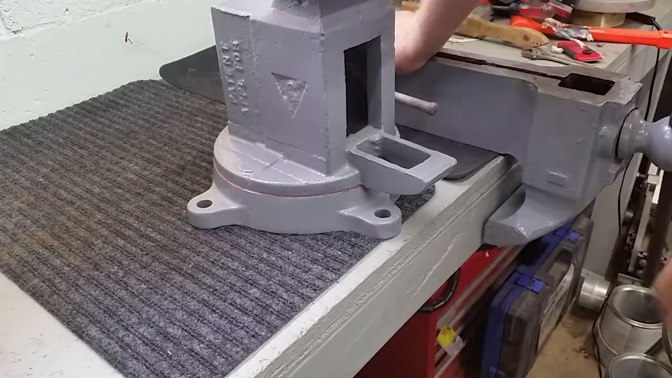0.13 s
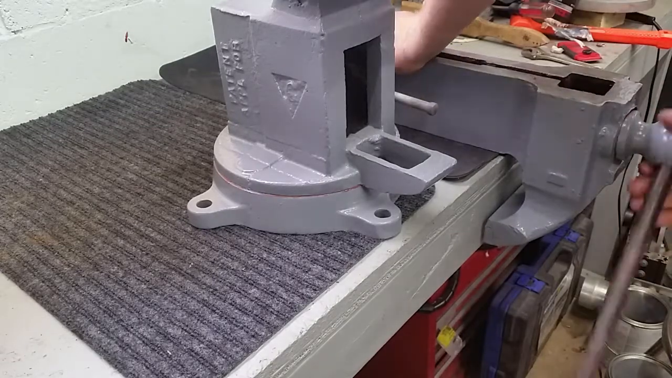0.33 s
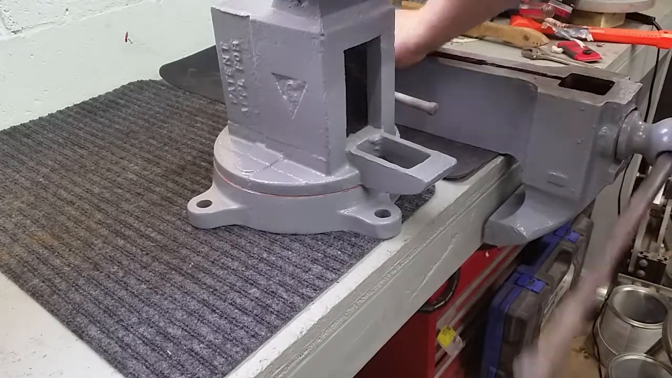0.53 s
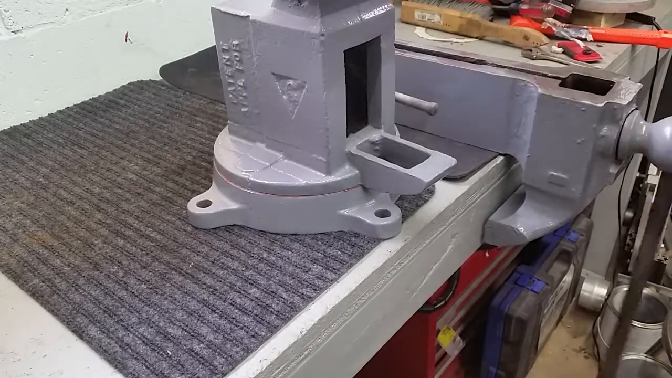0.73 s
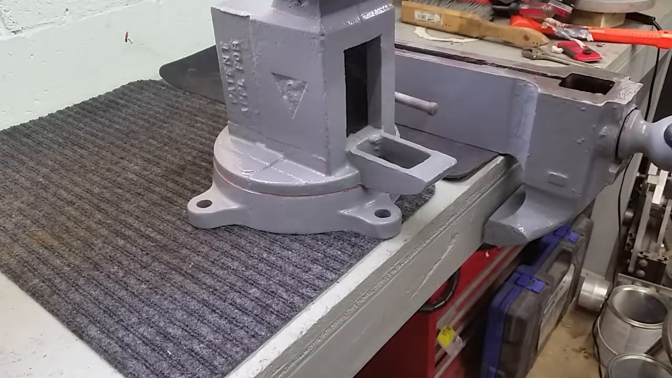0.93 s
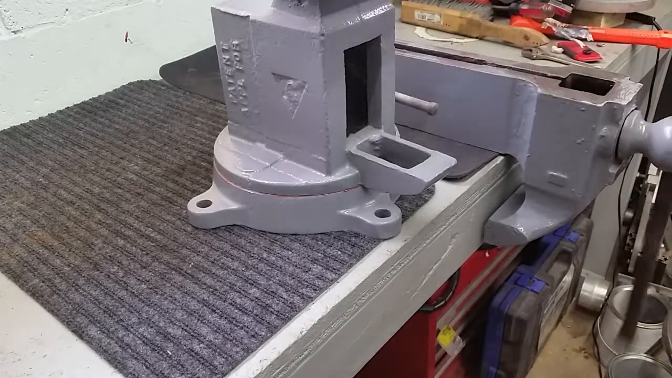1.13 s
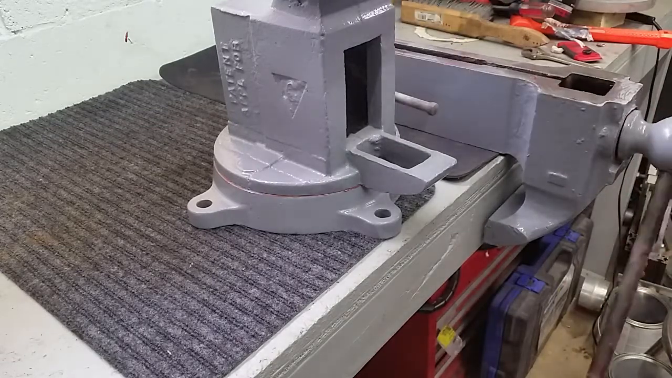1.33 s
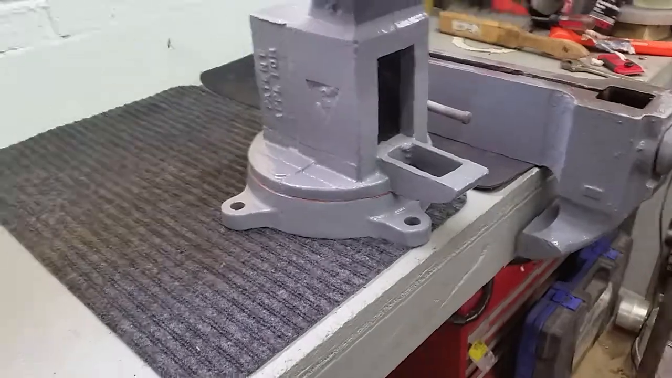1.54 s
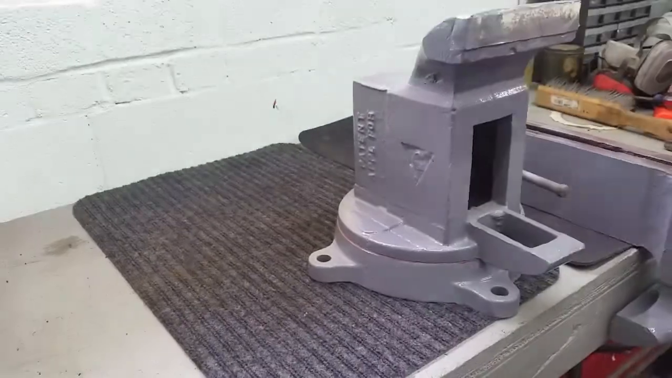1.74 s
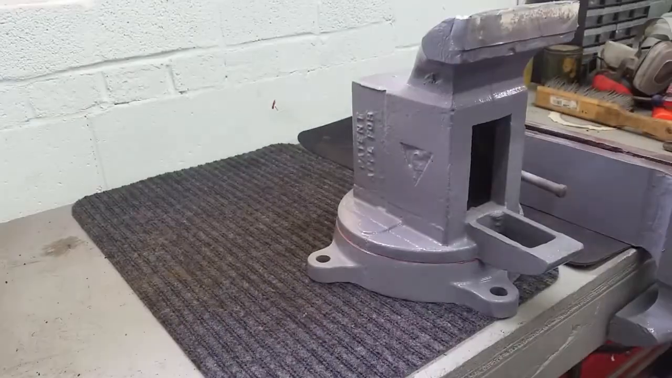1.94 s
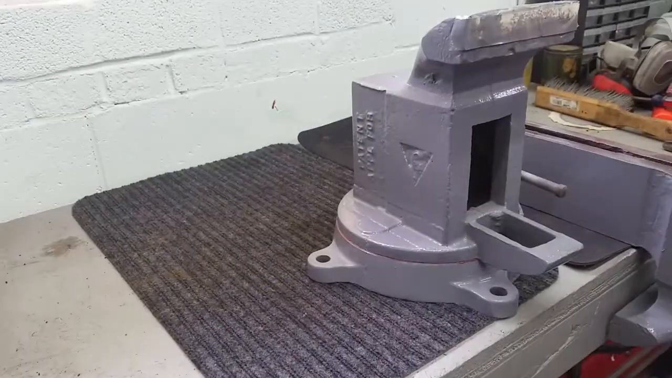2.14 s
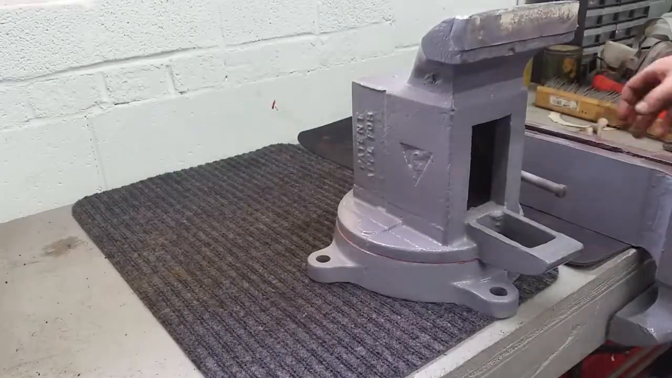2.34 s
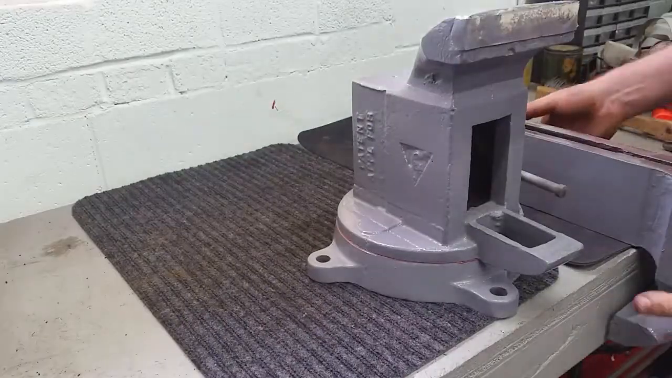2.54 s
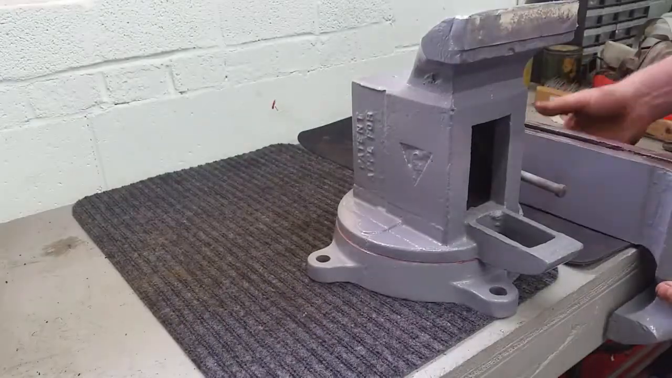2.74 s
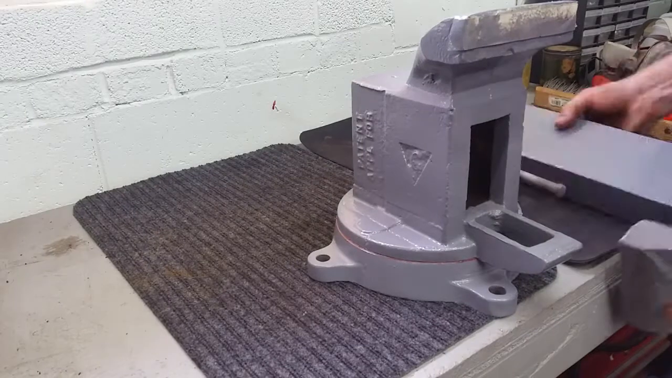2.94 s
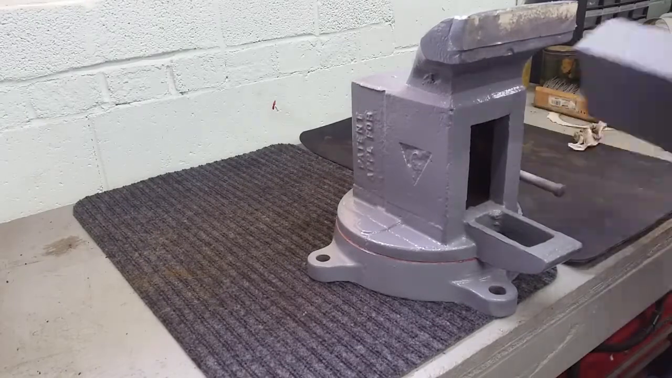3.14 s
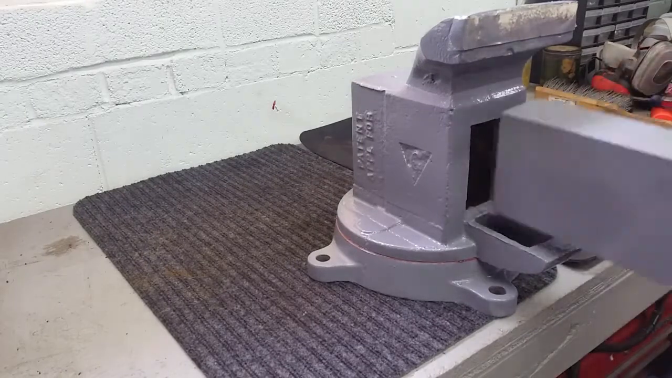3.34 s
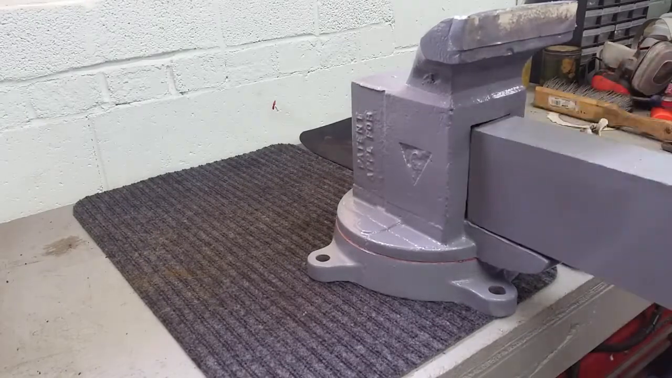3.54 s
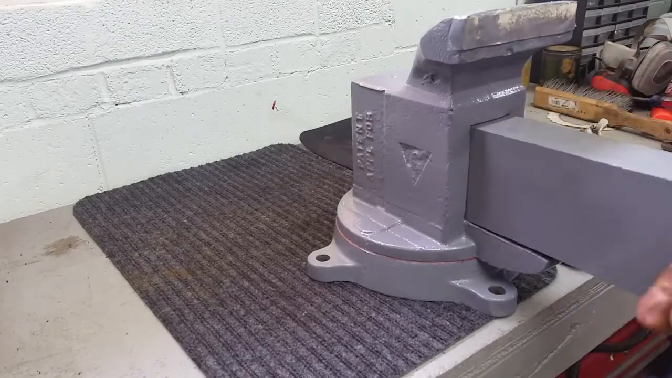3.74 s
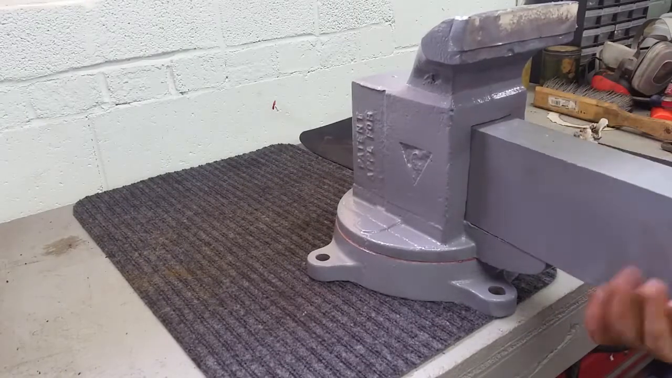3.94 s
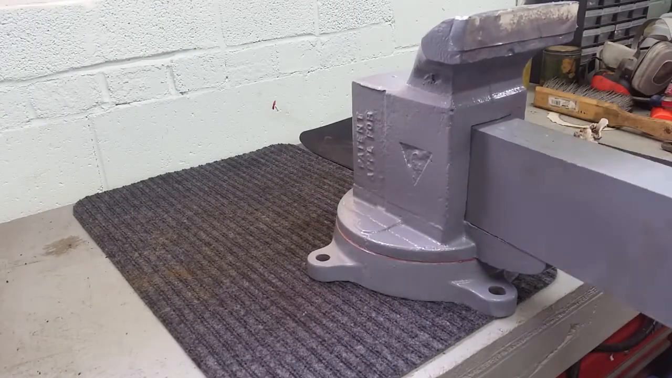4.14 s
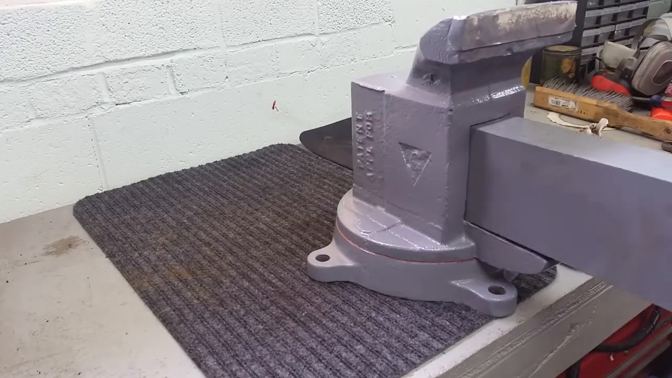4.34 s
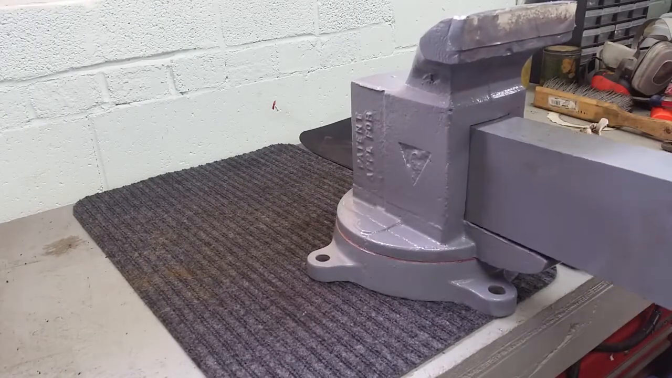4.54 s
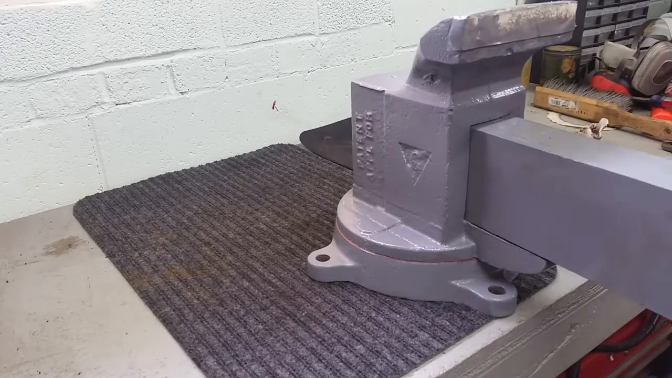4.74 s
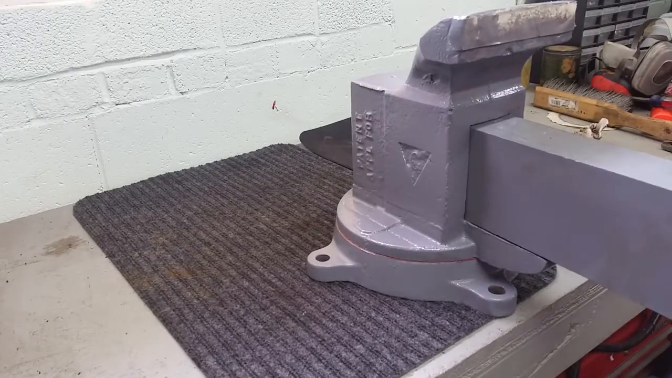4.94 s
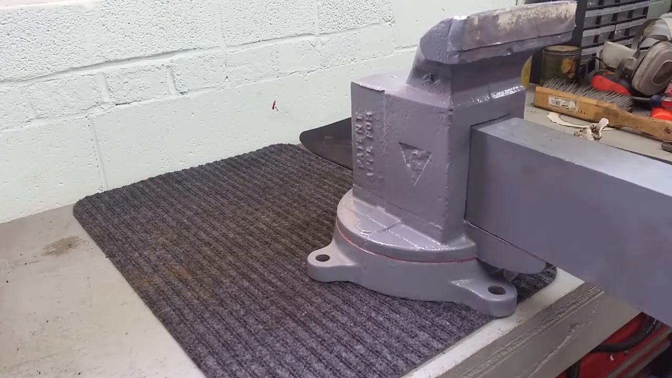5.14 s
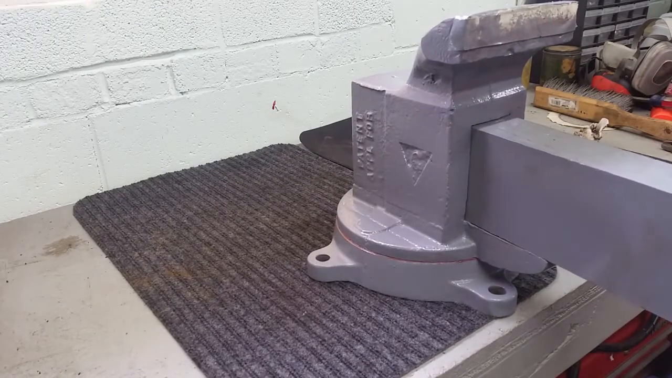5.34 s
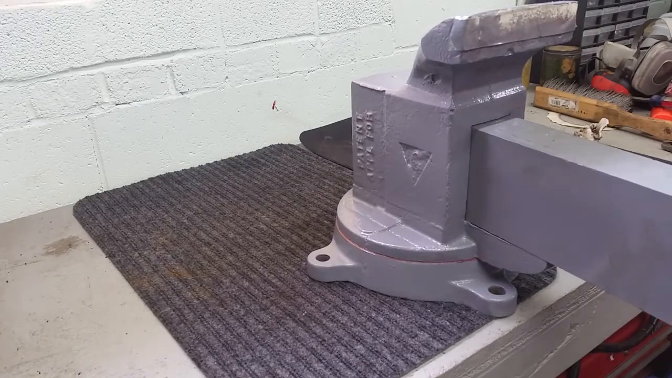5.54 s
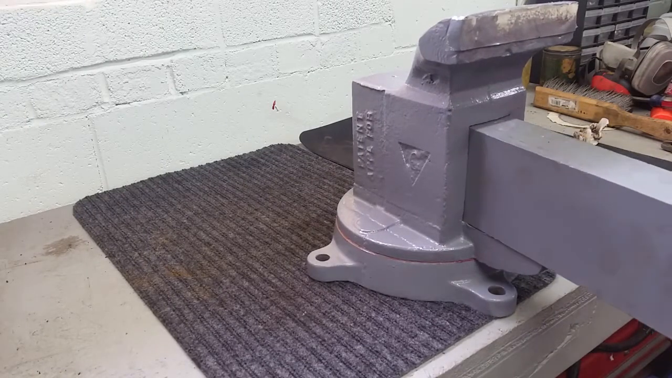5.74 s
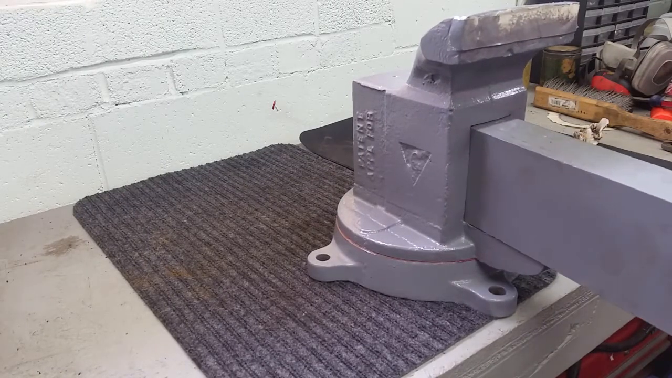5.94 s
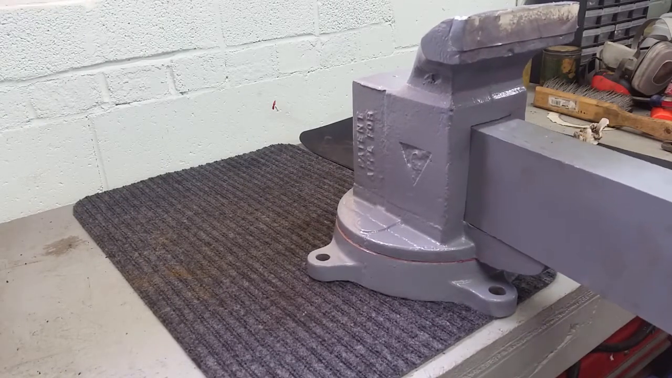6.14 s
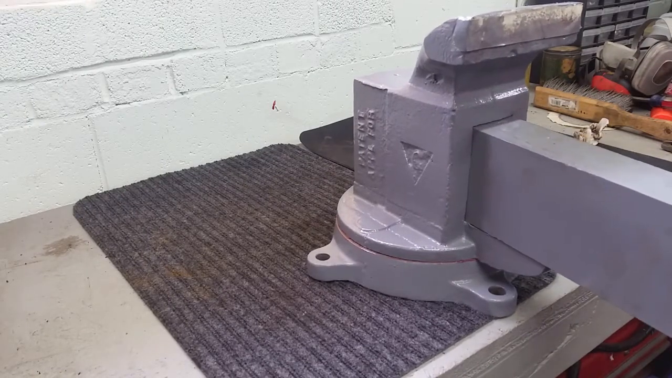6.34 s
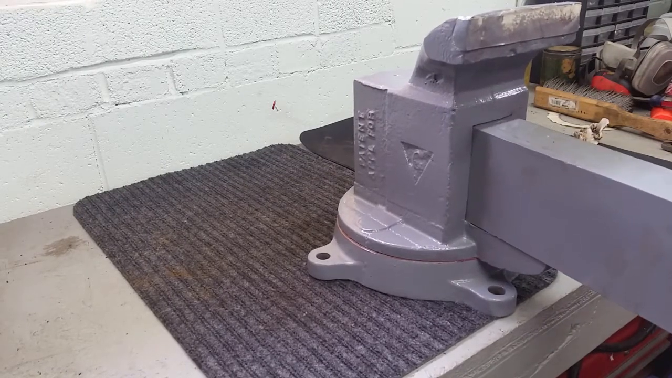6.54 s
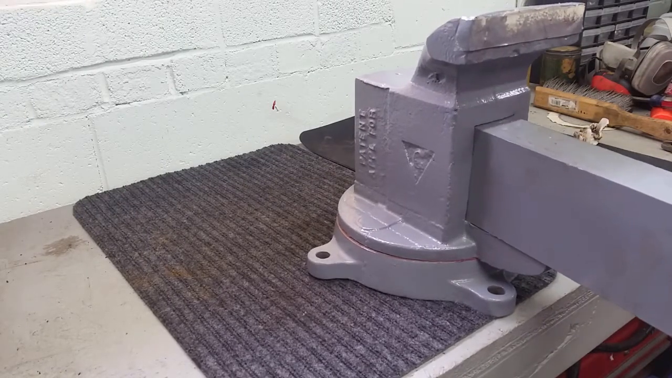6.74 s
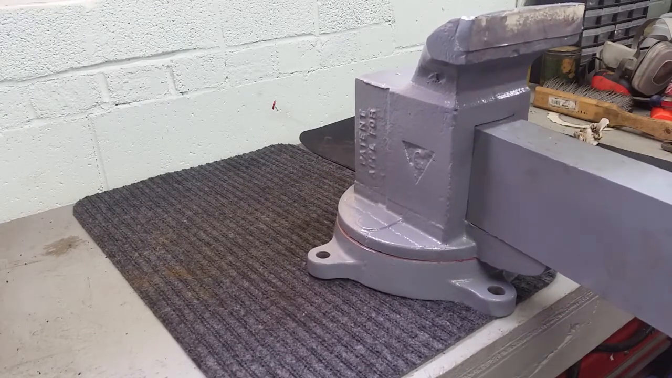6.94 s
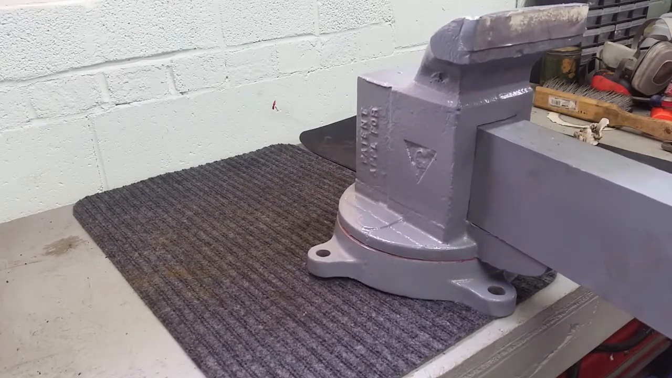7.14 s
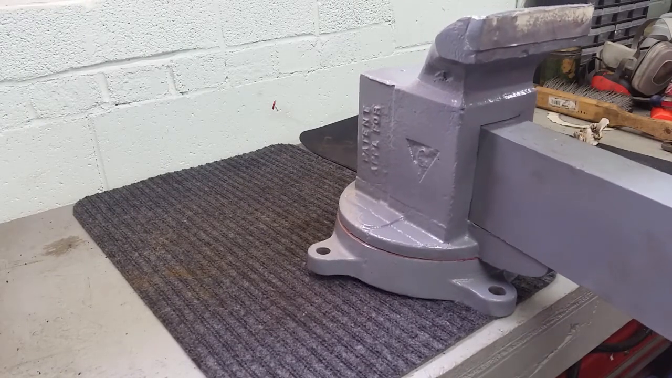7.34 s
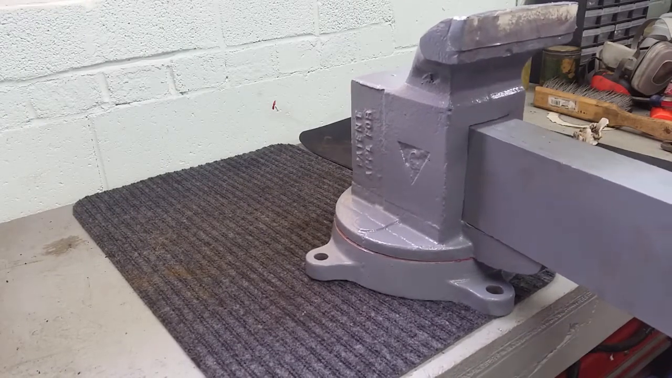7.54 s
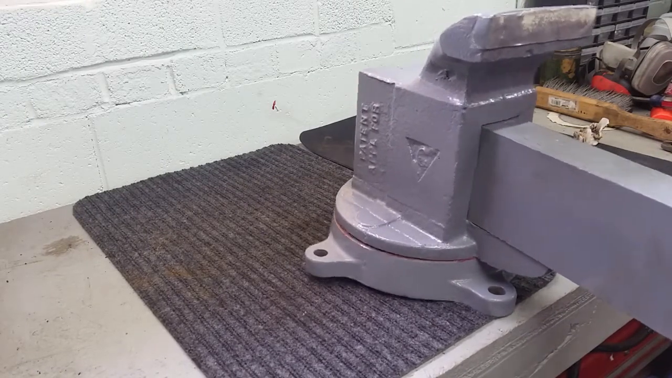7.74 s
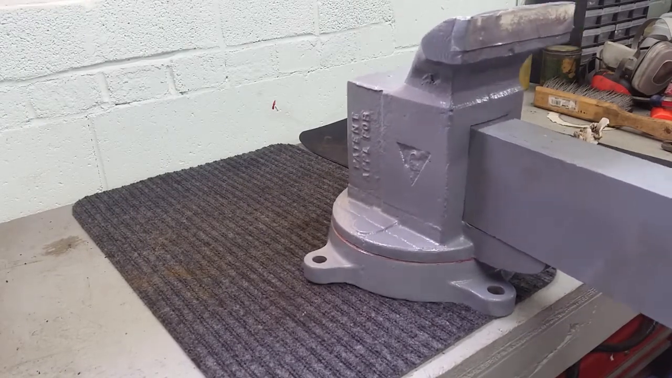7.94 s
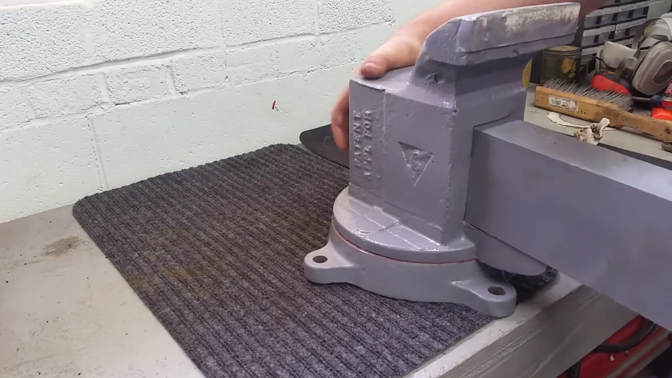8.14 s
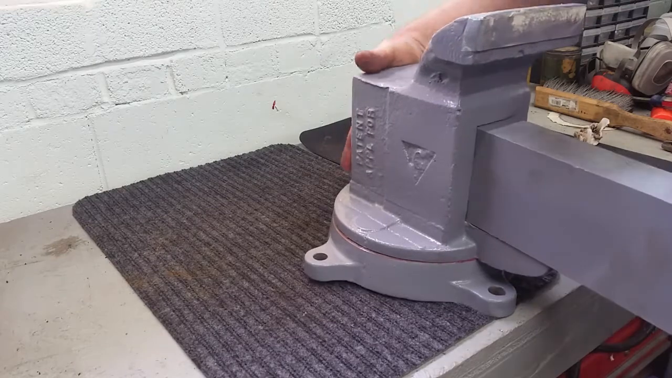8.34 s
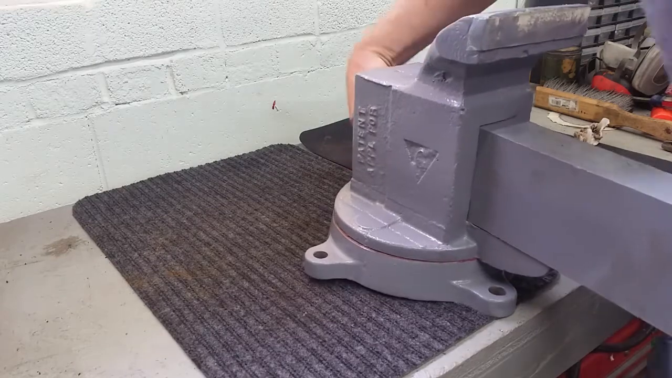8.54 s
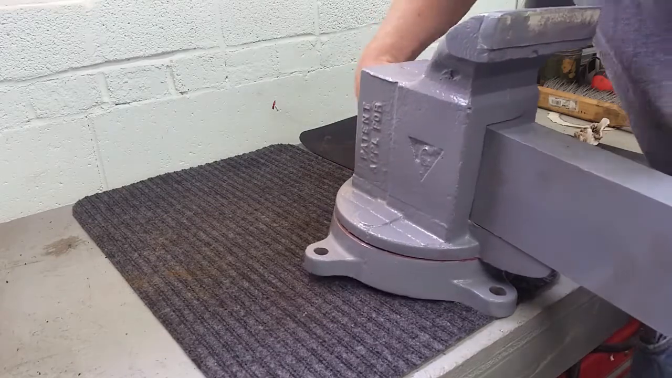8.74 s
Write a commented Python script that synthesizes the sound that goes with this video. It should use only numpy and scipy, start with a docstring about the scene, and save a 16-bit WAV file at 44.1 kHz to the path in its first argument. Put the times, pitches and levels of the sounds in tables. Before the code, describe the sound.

A close, dry stereo view of a heavy cast-iron vise on a workshop bench, over a faint wavering low hum and thin patchy hiss that fades in and briefly dips five times. From 0 to 0.8 s a loose handle clinks and rubs irregularly; from 0.9 to 1.4 s it ticks evenly about every 0.13 s, with soft treble rustles. At 1.5-1.8 s parts clatter down very loudly, stronger on the left, with a tiny rough squeal near 1.65. A soft scuff comes at 2.3, then mostly quiet. From 3.2 to 4 s the slide knocks into the body, bright and ringing, then duller, ending in a scuff. From 4.5 s the screw is wound in: irregular clicks and short gritty scrapes, a hard knock at 5.2, others at 5.8 and 6.0, busy scraping around 7, lower knocks and scuffs at 7.5-8.2, then faint handling and a dull rub near 8.8.

```python
"""In a workshop, a cast-iron bench vise is handled on a mat, over a low wavering hum and a thin patchy hiss
whose level dips briefly five times. The handle clinks, then ticks evenly; parts clatter down and squeal;
the slide knocks into the body; the screw is wound in, scraping and knocking.
Blows are noise bursts ringing the modes of a part; rubbing is noise with uneven grain driving those modes;
the squeal is a jittering tone; hum is sines and narrow noise; hiss, scuffs and rustles are shaped noise."""
import sys
import numpy as np
from scipy import signal
from scipy.fft import rfft, irfft
from scipy.io import wavfile
from scipy.ndimage import uniform_filter1d

SR = 44100
rng = np.random.default_rng(int(sys.argv[2]) if len(sys.argv) > 2 else 0)


def dump(signal):
    """Clip the signal to [-1, 1] and save it as 16-bit WAV at the path in sys.argv[1]."""
    limited = np.clip(np.atleast_2d(signal).T, -1, 1)
    pcm = np.round(limited * 32767).astype(np.int16)
    wavfile.write(sys.argv[1], SR, pcm)


N = 392049


def amp(db):
    """Amplitude ratio of a level in dB."""
    return 10 ** (np.asarray(db) / 20)


def evened(x):
    """Scales to an RMS of 1."""
    return x / np.sqrt(np.mean(x ** 2) + 1e-20)


def clock():
    """Time of every sample in s."""
    return np.arange(N) / SR


def read(points, hz):
    """Interpolates a spectrum table over log frequency."""
    point_hz, value = np.transpose(points)
    return np.interp(np.log(hz + 1), np.log(point_hz + 1), value)


def curve(rows, column=1):
    """Interpolates a table column over time."""
    rows = np.array(rows)
    return np.interp(clock(), rows[:, 0], rows[:, column])


def add(mix, start_s, sound):
    """Mixes a sound in place, cut at the end."""
    part = mix[round(start_s * SR):][:len(sound)]
    part += sound[:len(part)]


def coloured(x, gain):
    """Filters by a gain given as a function of Hz."""
    return irfft(rfft(x) * gain(np.fft.rfftfreq(x.shape[-1], 1 / SR)), x.shape[-1])


def strokes(rows, order):
    """Smooth swells of level; a higher order is flatter on top."""
    t = np.arange(0, N + 32, 32) / SR
    level = sum(amp(db) * np.exp(-abs(2 * (t - middle_s) / length_s) ** order)
                for middle_s, length_s, db in rows)
    return np.interp(clock(), t, level)


def ring(modes, weights, width_scale):
    """Response of a part to one tap: sines that die faster the wider the mode."""
    hz, width_hz, db = np.transpose(modes)[:, :, None]
    t = np.arange(SR // 6) / SR
    width_hz = width_hz * width_scale
    level = weights[:, None] * amp(db) * np.sqrt(width_hz)
    return (level * np.exp(-np.pi * width_hz * t) * np.sin(2 * np.pi * hz * t)).sum(axis=0)


RATTLE_SPREAD_DB, THUD_T60_S = -1.5, .11
FOCUS_DB_PER_OCTAVE, FOCUS_FLOOR_DB = -20, -12  # modes far from the pitch ring less
DETUNE = .015  # random spread of mode pitch, as a fraction
SEATED_DAMPING = 3.0  # a blow that thuds into the bench rings shorter


def blows(table, columns, usual, modes, width_scale, crack_db, snap_t60_s, rattle_t60_s):
    """A snap and a weaker rattle ring the modes near a pitch, crack broadly and thud into the bench."""
    out, t = np.zeros(N), np.arange(SR // 5) / SR
    low = signal.butter(2, [370, 660], "band", fs=SR, output="sos")
    mid = signal.butter(4, [usual["lowest_hz"], 6200], "band", fs=SR, output="sos")
    high = signal.butter(4, 6200, "high", fs=SR, output="sos")
    rise = np.minimum(t / usual["rise_s"], 1)  # contact builds up
    end_fade = np.cos(np.pi / 2 * t / t[-1])
    for start_s, level_db, *own in table:
        blow = {**usual, **dict(zip(columns, own))}
        rattle_db = blow["rattle_db"] + RATTLE_SPREAD_DB * rng.standard_normal()
        decay = amp(-60 * t / snap_t60_s) + amp(rattle_db - 60 * t / rattle_t60_s)
        force = rng.standard_normal(len(t)) * rise * decay

        octaves_off = np.minimum(abs(np.log2(np.transpose(modes)[0] / blow["pitch_hz"])), 1)
        focus_db = np.maximum(FOCUS_DB_PER_OCTAVE * octaves_off, FOCUS_FLOOR_DB)
        weights = amp(focus_db + 2.5 * rng.standard_normal(len(modes)))
        # detune the mode pitches only, not widths or levels
        struck = np.array(modes) * (1 + DETUNE * rng.standard_normal((len(modes), 1)) * [1, 0, 0])
        damped = width_scale * (1 + SEATED_DAMPING * min(amp(blow["thud_db"]), 1))
        body = signal.fftconvolve(force, ring(struck, weights, damped))[:len(t)]
        metal = body / abs(body).max() + amp(crack_db) * force / abs(force).max()

        thud = signal.sosfilt(low, rng.standard_normal(len(t)) * amp(-60 * t / THUD_T60_S))
        bands = ((thud, blow["thud_db"]),
                 (signal.sosfilt(mid, metal), 0),
                 (signal.sosfilt(high, metal), blow["bright_db"]))
        sound = sum(amp(level_db + db) * band / abs(band).max() for band, db in bands)
        add(out, start_s, sound * end_fade)
    return out


# hiss of grit between the modes: pitch_hz, gain_db [dB per Hz, relative]
GRIT_SPECTRUM = [(150, -21), (400, -19.5), (1500, -20), (4000, 10.5), (6000, 4), (10500, -6.5),
                 (16000, -0.5)]
RUB_FOCUS_DB_PER_OCTAVE = -13  # below 6 kHz a stroke favours the modes near its pitches


def rub(rows, modes, width_scale, grit_db, grain_db):
    """Dense uneven slips drive each mode by its own wandering amount, with a broad hiss of grit."""
    grain = evened(uniform_filter1d(rng.standard_normal(N), 150))
    slips = evened(rng.standard_normal(N) * amp(grain_db * grain))
    swell = strokes([row[:3] for row in rows], order=2)
    out = coloured(slips * swell, lambda hz: amp(read(GRIT_SPECTRUM, hz) + grit_db))
    size = np.linalg.norm(ring(modes, np.ones(len(modes)), width_scale))
    for mode in modes:
        focus = RUB_FOCUS_DB_PER_OCTAVE * (mode[0] < 6000)
        focused = []
        for middle_s, length_s, level_db, *pitches_hz in rows:
            octaves_off = min(abs(np.log2(mode[0] / np.array(pitches_hz))).min(), 1)
            focused.append((middle_s, length_s, level_db + focus * octaves_off))
        contact = amp(3.0 * evened(uniform_filter1d(rng.standard_normal(N), 2500)))
        drive = slips * strokes(focused, order=2) * contact
        out += signal.oaconvolve(drive, ring([mode], np.ones(1), width_scale) / size)[:N]
    return coloured(out, lambda hz: hz ** 2 / (hz ** 2 + 250 ** 2))  # no deep bass


# slow level of the background: time_s, level_db
BACKGROUND_LEVEL = [(0, 4), (2.1, -0.5), (5.2, 4), (6, 6), (6.8, 5), (7.3, 7.5), (8.89, -2)]
# brief dips of the background: start_s, length_s, depth_db
BACKGROUND_DIPS = [(1.544, 0.43, -13), (5.175, 0.3, -15.5), (5.997, 0.33, -10), (6.389, 0.29, -15),
                   (7.037, 0.28, -9)]
DIP_AT_ONCE, DIP_FALL_S, DIP_RETURN_S = 0.67, 0.037, 0.093  # share of the depth in the quick fall
FADE_IN_DB, FADE_IN_S = -15, 0.46


def background_db():
    """Slow level, a fade-in and dips: a quick fall, a slower one, then the return."""
    t = clock()
    level = curve(BACKGROUND_LEVEL) + FADE_IN_DB * np.clip(1 - t / FADE_IN_S, 0, 1)
    for start_s, length_s, depth_db in BACKGROUND_DIPS:
        corners_s = [0, DIP_FALL_S, max(length_s, DIP_FALL_S), length_s + DIP_RETURN_S]
        level += depth_db * np.interp(t - start_s, corners_s, [0, DIP_AT_ONCE, 1, 0])
    return level


# spectrum of the room noise: pitch_hz, gain_db [dB per Hz, relative]
AIR_SPECTRUM = [(30, -54), (140, -6.5), (180, -9), (480, -2.5), (900, -8), (1430, -7), (2830, -12.5),
                (5500, -14.5), (7270, -6), (9500, -12.5), (16000, -20)]
# correlation of the left and right noise: pitch_hz, likeness [-1 to 1]
LEFT_RIGHT_LIKENESS = [(240, 0.99), (950, 0.89), (8000, -0.27)]
AIR_DB = -48.5  # RMS, before the slow level


def air():
    """Stereo noise shaped frame by frame, in patches of time and frequency."""
    frames, hz = N // 256 + 5, np.fft.rfftfreq(1024, 1 / SR)
    a, b, c, d, patches = rng.standard_normal((frames, 513, 5)).T
    patches = evened(uniform_filter1d(uniform_filter1d(patches, 14, 0), 12, 1))
    same = np.clip(read(LEFT_RIGHT_LIKENESS, hz), -1, 1)[:, None]
    left = a + 1j * b
    right = same * left + np.sqrt(1 - same ** 2) * (c + 1j * d)
    spectra = np.array([left, right]) * amp(read(AIR_SPECTRUM, hz)[:, None] + 1.9 * patches)
    return amp(AIR_DB) * evened(signal.istft(spectra, nperseg=1024, noverlap=768)[1][:, :N])


# hum partials: pitch_hz, level_db [RMS, before waver and slow level]
HUM_PARTIALS = [(232.6, -50.5), (474, -63)]
LOW_HUM_HZ, LOW_HUM_DB, LOW_HUM_FROM_S = 174, -60.5, 6.2


def hum():
    """Sines wavering in level, joined late by a lower narrow band of noise."""
    t = clock()
    waver = amp(1.8 * evened(uniform_filter1d(rng.standard_normal(N), 3000)))
    tones = sum(np.sqrt(2) * amp(db) * np.sin(2 * np.pi * hz * t) for hz, db in HUM_PARTIALS)
    fuzzy = evened(coloured(rng.standard_normal(N), lambda hz: 1 / (1 + ((hz - LOW_HUM_HZ) / 8) ** 2)))
    return tones * waver + amp(LOW_HUM_DB) * fuzzy * (t > LOW_HUM_FROM_S)


def background():
    """Room noise and hum under one slow level."""
    return (air() + hum()) * amp(background_db())


FAINT_PER_S, FAINT_DB, FAINT_SPREAD_DB = 9, -44.5, 5.5


def faint_ticks():
    """Small random ticks of handling: weak, heavily damped blows on the screw modes."""
    when, size, pitch = rng.random((round(FAINT_PER_S * N / SR), 3)).T
    level_db = FAINT_DB - FAINT_SPREAD_DB * np.log(size + 0.039)
    rows = zip(when * N / SR, level_db, 1500 * 3 ** pitch)
    usual = {**SCREW_BLOW, "thud_db": -12, "bright_db": -8}
    return blows(rows, ["pitch_hz"], usual, SCREW_MODES,
                 width_scale=9.0, crack_db=11.0, snap_t60_s=0.0036, rattle_t60_s=0.095)


# dull rubbing on the mat: middle_s, length_s, level_db
MAT_RUBS = [(6.8, 0.24, -51), (8.82, 0.12, -48)]
MAT_RUB_HZ = 760


def low_rubs():
    """Dull rubbing on the mat: narrow noise in smooth swells."""
    hiss = evened(coloured(rng.standard_normal(N), lambda hz: 1 / (1 + ((hz - MAT_RUB_HZ) / 120) ** 2)))
    return hiss * strokes(MAT_RUBS, order=2)


# soft broad scuffs of hands and mat: start_s, level_db, t60_s
MAT_SCUFFS = [(2.266, -38.5, 0.14), (2.357, -23.5, 0.11), (3.938, -26.5, 0.1), (5.367, -43, 0.099),
              (7.74, -25.5, 0.14), (8.159, -38, 0.14)]


def scuffs():
    """Broad hiss that starts in a few milliseconds and dies away."""
    t = clock()
    hiss = evened(coloured(rng.standard_normal(N),
                           lambda hz: 1 / (1 + (1200 / (hz + 1)) ** 4) / (1 + hz / 5000)))
    level = sum(np.clip((t - start_s) / 0.0061, 0, 1) * amp(db - 60 * abs(t - start_s) / t60_s)
                for start_s, db, t60_s in MAT_SCUFFS)
    return hiss * level


# high swishes: middle_s, length_s, level_db
SWISHES = [(1.12, 0.053, -41.5), (1.255, 0.03, -33.5), (1.34, 0.037, -30)]


def rustles():
    """Short soft puffs of treble hiss."""
    hiss = evened(coloured(rng.standard_normal(N), lambda hz: 1 / (1 + (5500 / (hz + 1)) ** 4)))
    return hiss * strokes(SWISHES, order=4)


# course of the squeal: time_s, level_db, pitch_hz
SQUEAL_COURSE = [(1.648, -9, 2050), (1.657, -10, 2120), (1.667, -7, 2200), (1.673, -9, 2100),
                 (1.677, -30, 2170), (1.692, -45, 2170)]


def squeal():
    """A fast stick-slip: a rough, fluttering tone with a strong octave, in a burst of hiss."""
    jitter, flutter = (evened(uniform_filter1d(rng.standard_normal(N), 40)) for _ in range(2))
    pitch_hz = curve(SQUEAL_COURSE, column=2) * (1 + .06 * jitter)
    phase = 2 * np.pi * np.cumsum(pitch_hz) / SR
    octave = 1.2 * amp(3 * flutter) * np.sin(2 * phase + 1.5)
    hiss = .5 * np.diff(rng.standard_normal(N + 1))
    t = clock()
    sounding = (t > SQUEAL_COURSE[0][0]) * (t < SQUEAL_COURSE[-1][0])
    return (np.sin(phase) + octave + hiss) * amp(curve(SQUEAL_COURSE)) * sounding


# loose handle blows: start_s, level_db, thud_db, bright_db [last two against level_db]
HANDLE_CLINKS = [(0.0737, -35.5, 0.5, 13.5), (0.1278, -31, -1.5, 10.5), (0.172, -19, -17, 7.5),
                 (0.2633, -22, -15.5, 5.5), (0.3135, -35, 5, -25), (0.4077, -21, -5.5, -9),
                 (0.4653, -23.5, -10, 3.5), (0.5169, -16.5, -13, -15), (0.5362, -28.5, -38, 8.5),
                 (0.5574, -18, -13.5, 1), (0.639, -18.5, -21, -6), (0.6505, -10.5, -27.5, -39),
                 (0.6897, -13.5, -43, -5.5), (0.8074, -28, -25, -29), (0.967, -34, -8, -4)]
# handle resonances: pitch_hz, width_hz [before damping], level_db
HANDLE_MODES = [(500, 60, 2), (1700, 120, 1), (2040, 100, 2), (2630, 32, -17), (3410, 70, 0),
                (3850, 190, 0), (4080, 80, 2), (4230, 25, -4), (5720, 30, -6), (6200, 30, -10)]
# handle rubbing: middle_s, length_s, level_db, favoured pitch_hz
HANDLE_STROKES = [(.1, 0.23, -39, 2920), (.148, 0.043, -34.5, 3300), (.33, 0.093, -47, 3700),
                  (.44, 0.022, -24.5, 2550), (.49, 0.1, -35, 3820), (.657, 0.043, -27, 2100)]
TICKS_FROM_S, TICK_EVERY_S, TICK_COUNT = .8957, .1318, 5  # once a turn
TICK_DB, TICK_THUD_DB, TICK_BRIGHT_DB = -22, -23, 6.5
HANDLE_BLOW = dict(rattle_db=-14, pitch_hz=2900, rise_s=.0015, lowest_hz=1200)


def handle():
    """Loose clinks, even ticks and light rubbing of the handle, with rustles."""
    ticks = [(TICKS_FROM_S + k * TICK_EVERY_S, TICK_DB, TICK_THUD_DB, TICK_BRIGHT_DB)
             for k in range(TICK_COUNT)]
    clinks = blows(HANDLE_CLINKS + ticks, ["thud_db", "bright_db"], HANDLE_BLOW, HANDLE_MODES,
                   width_scale=1.2, crack_db=-11, snap_t60_s=.016, rattle_t60_s=.12)
    return clinks + rub(HANDLE_STROKES, HANDLE_MODES, width_scale=.8, grit_db=-8, grain_db=3) + rustles()


# single blows of parts: start_s, level_db, pitch_hz
PART_CLATTER = [(1.5815, 2.5, 1200), (1.59, -15, 1200), (1.633, -12, 4590), (1.6485, 1, 2190),
                (1.708, -15, 4500), (1.7695, -15, 4260), (1.8843, -27.5, 2090)]
# landings, an edge tick and then a low blow: blow start_s, blow level_db, tick level_db, tick pitch_hz
PART_LANDINGS = [(1.5, -4, -17.5, 2060), (1.545, -8, -6, 4400), (1.5749, -19.5, 2, 4220),
                 (1.736, -14.5, -3, 2060)]
# part resonances: pitch_hz, width_hz [before damping], level_db
PART_MODES = [(700, 200, -3), (1150, 170, 4), (1960, 350, 4), (2700, 500, 5), (4500, 900, 10)]
EDGE_LEADS_S, LANDING_HZ = 0.0058, 1020
PARTS_BLOW = dict(rattle_db=-19, thud_db=-36, bright_db=-10, rise_s=0.0003, lowest_hz=600)


def parts():
    """Parts clatter down: each landing is a thin edge tick, then the full blow."""
    landed = [(start_s, db, LANDING_HZ) for start_s, db, _, _ in PART_LANDINGS]
    edges = [(start_s - EDGE_LEADS_S, db, hz) for start_s, _, db, hz in PART_LANDINGS]
    return blows(PART_CLATTER + landed + edges, ["pitch_hz"], PARTS_BLOW, PART_MODES,
                 width_scale=1.2, crack_db=3, snap_t60_s=0.005, rattle_t60_s=0.045)


# slide blows: start_s, level_db, thud_db [against level_db], pitch_hz
SLIDE_KNOCKS = [(3.219, -20, -41, 1720), (3.231, -7.5, -41, 3700), (3.2557, -10.5, -52, 3450),
                (3.269, -4.5, -56, 3000), (3.3377, -12, -47, 2620), (3.4674, -10, -1.5, 3050),
                (3.5036, -23.5, 9, 2380), (3.6319, -17.5, -7, 2340), (3.7277, -29.5, -11, 2410),
                (3.7838, -20.5, -6.5, 5100), (3.813, -22.5, -11, 2320), (3.9383, -20.5, -4, 4130),
                (4.0, -35.5, 4.5, 1600), (4.0185, -24.5, 2.5, 1630)]
# slide resonances: pitch_hz, width_hz [before damping], level_db
SLIDE_MODES = [(1670, 160, -8), (2360, 90, -2), (2640, 45, -1), (3470, 75, -2), (4100, 66, -5),
               (5700, 46, -13), (7460, 51, -23)]
SLIDE_BLOW = dict(rattle_db=-13.5, bright_db=-4, rise_s=0.00048, lowest_hz=1080)


def slide():
    """The slide knocks as it is pushed into the body: blows on long-ringing modes."""
    return blows(SLIDE_KNOCKS, ["thud_db", "pitch_hz"], SLIDE_BLOW, SLIDE_MODES,
                 width_scale=0.71, crack_db=-8.5, snap_t60_s=0.024, rattle_t60_s=0.15)


# screw blows: start_s, level_db, thud_db, bright_db [both against level_db], pitch_hz
SCREW_KNOCKS = [(4.4885, -27, -14, 0.5, 1370), (4.5, -28.5, -4, -1, 3150), (4.7362, -22.5, -37, -24, 2500),
                (4.7535, -13.5, -46, 7, 3380), (4.8016, -10.5, -31.5, 7, 2650),
                (4.8449, -18.5, -44, 9, 2640), (4.9812, -25, -28, -29, 2820),
                (5.0367, -21, -36, 11.5, 3630), (5.0769, -9.5, -15, 0, 2800),
                (5.2116, -1.5, -29.5, 9.5, 3030), (5.4909, -25.5, -16, -5.5, 3950),
                (5.5868, -20.5, -26, -8.5, 4130), (5.6336, -18.5, -31, 9.5, 4270),
                (5.7535, -19, -18, -37, 2520), (5.7778, -4.5, -17.5, -7.5, 4440),
                (6.0388, -8, -24, 13, 3540), (5.805, -20.5, -8, -22, 2540),
                (7.447, -23.5, -37, -17.5, 3250), (6.1918, -26.5, -10, 2, 4200),
                (6.2755, -20.5, -34, 13.5, 1700), (6.4267, -17.5, -16, 16, 2490),
                (6.9527, -13, -40, 12.5, 3480), (6.9857, -10.5, -18, -5, 3900),
                (7.051, -12.5, -15.5, 16.5, 4130), (7.3076, -20.5, -34, 0, 4050),
                (7.3394, -14.5, -18.5, 9.5, 4040), (7.5539, -22, -13, 1, 3460),
                (7.5838, -15, -4.5, -16, 1100), (7.6405, -17.5, -18, 5, 3630),
                (7.847, -23.5, -5, -14, 1640), (7.865, -8, -7.5, -10.5, 1300), (7.9132, -25, -12, -5, 2590),
                (7.9877, -23, -6, -32, 1580), (8.2354, -24, -14, 4, 2050)]
# screw resonances: pitch_hz, width_hz [before damping], level_db
SCREW_MODES = [(1100, 89, -5), (1640, 45, 0), (2420, 90, -1), (2650, 80, -4), (3120, 70, 0), (4020, 110, 2),
               (4520, 60, -10), (5400, 100, -11), (8200, 200, -11), (9270, 99, -11), (10500, 110, 5)]
# screw scraping: middle_s, length_s, level_db, two favoured pitch_hz
SCREW_STROKES = [(4.77, 0.051, -32, 3120, 1640), (4.865, 0.06, -25.5, 2640, 3120),
                 (5.095, 0.037, -31.5, 2660, 1640), (5.19, 0.045, -30, 3040, 4020),
                 (5.24, 0.094, -36, 2710, 3120), (5.88, 0.062, -19, 3160, 4200),
                 (5.92, 0.03, -23.5, 3200, 1640), (6.01, 0.11, -28, 1640, 3120),
                 (6.295, 0.07, -29.5, 1570, 3500), (6.395, 0.078, -31.5, 1640, 3120),
                 (6.45, 0.072, -34, 4080, 2420), (6.826, 0.03, -19, 4000, 3120),
                 (6.847, 0.015, -29.5, 4020, 2420), (6.866, 0.033, -27, 4020, 2420),
                 (6.985, 0.071, -26.5, 3120, 4020), (7.021, 0.033, -23, 3120, 2420),
                 (7.07, 0.045, -26, 1640, 4020), (7.245, 0.052, -35.5, 4020, 2420),
                 (7.335, 0.051, -29, 4020, 4020), (7.39, 0.058, -27.5, 4020, 1640),
                 (7.485, 0.085, -32, 3120, 1100), (7.7, 0.094, -40.5, 3100, 1640)]
SCREW_BLOW = dict(rattle_db=-18.5, rise_s=0.0012, lowest_hz=1108)


def screw():
    """The screw is wound in: knocks and scraping strokes on the same modes."""
    knocks = blows(SCREW_KNOCKS, ["thud_db", "bright_db", "pitch_hz"], SCREW_BLOW, SCREW_MODES,
                   width_scale=1.7, crack_db=1, snap_t60_s=0.006, rattle_t60_s=0.11)
    return knocks + rub(SCREW_STROKES, SCREW_MODES, width_scale=1.1, grit_db=-6.5, grain_db=4)


def room(x, t60_s):
    """Sparse echoes of random sign, different on left and right."""
    t = np.arange(SR // 4) / SR
    signs = rng.choice([-1., 1.], (2, len(t)))
    kept = rng.random((2, len(t))) < .05
    taps = signs * kept * amp(-60 * t / t60_s) * (t > .002)
    return signal.fftconvolve(x[None], taps / np.linalg.norm(taps[0]), axes=1)[:, :N]


# stereo colour: pitch_hz, tilt_db [left minus right, before pan]
STEREO_TILT = [(3000, 1), (5000, 6.5), (9000, -4)]


def ports(x, lag_s, pan_db):
    """The sound reaches the left port a little later, and with another colour."""
    side = np.array([[.5], [-.5]])
    return coloured(x, lambda hz: amp(side * (read(STEREO_TILT, hz) + pan_db))
                    * np.exp(-2j * np.pi * side * hz * lag_s))


def scene():
    """Places the vise sounds in stereo, adds echoes and the background."""
    handle_sound, part_sound, slide_sound, screw_sound = handle(), parts(), slide(), screw()
    small = squeal() + scuffs() + low_rubs() + faint_ticks() * amp(background_db())
    direct = (ports(handle_sound + slide_sound + small, lag_s=3e-5, pan_db=-1.9)
              + ports(part_sound, lag_s=0.00016, pan_db=9.0)
              + ports(screw_sound, lag_s=3.2e-5, pan_db=-1.0))
    sent = handle_sound + amp(-3) * part_sound + slide_sound + screw_sound + small
    return direct + amp(-11) * room(sent, t60_s=0.03) + background()


EDGE_HZ = 15750


def record(dry):
    """The hardest peaks overload softly; the deep bass is thinned; then the band limit."""
    overloaded = .95 * np.tanh(dry / .95)
    thinned = signal.lfilter(*signal.butter(1, 70, "high", fs=SR), overloaded)
    band_limit = signal.firwin(511, EDGE_HZ, window=("kaiser", 9), fs=SR)
    return signal.oaconvolve(thinned, band_limit[None], "same")


dry = scene()
out = record(dry)
dump(out)
```